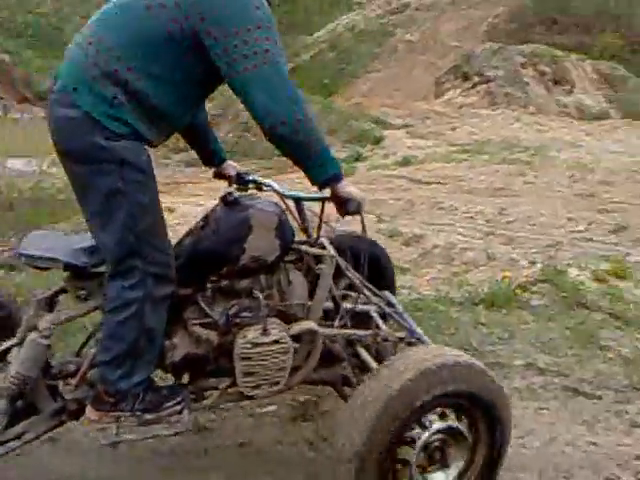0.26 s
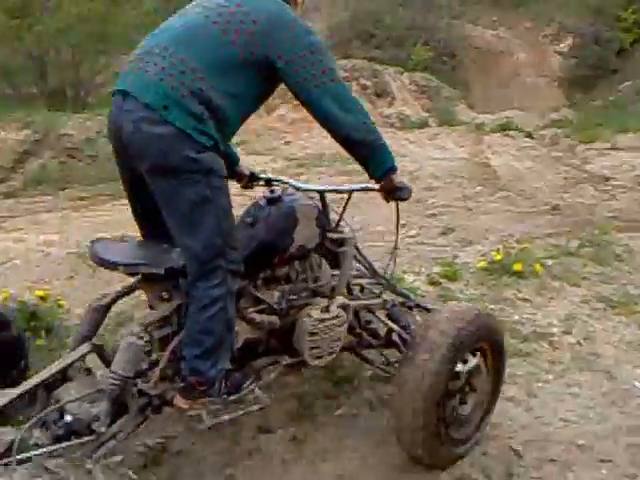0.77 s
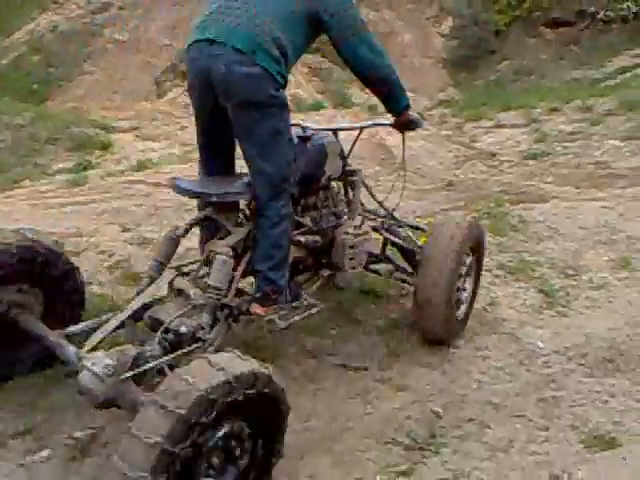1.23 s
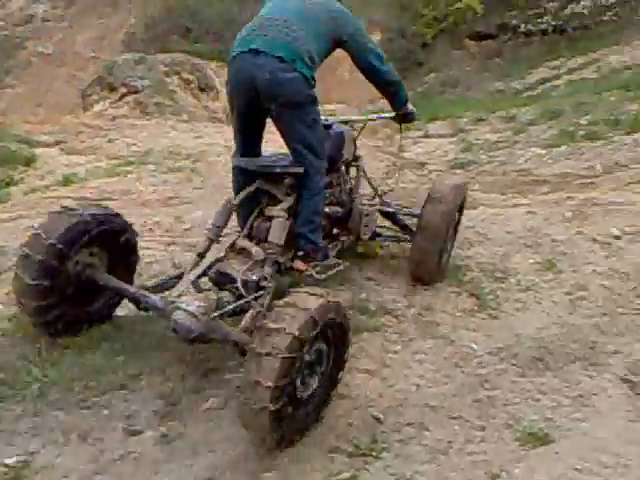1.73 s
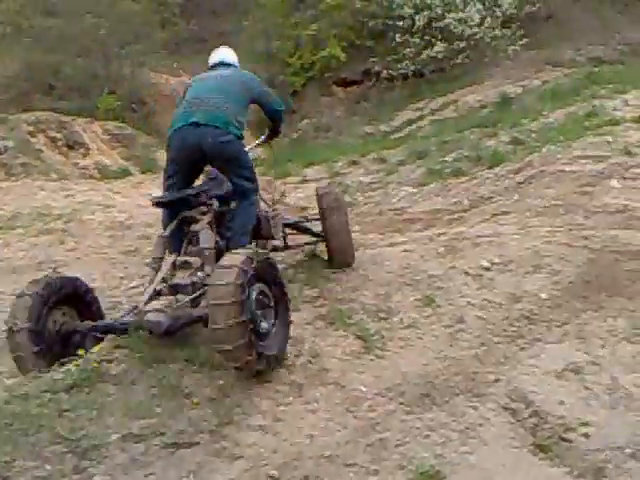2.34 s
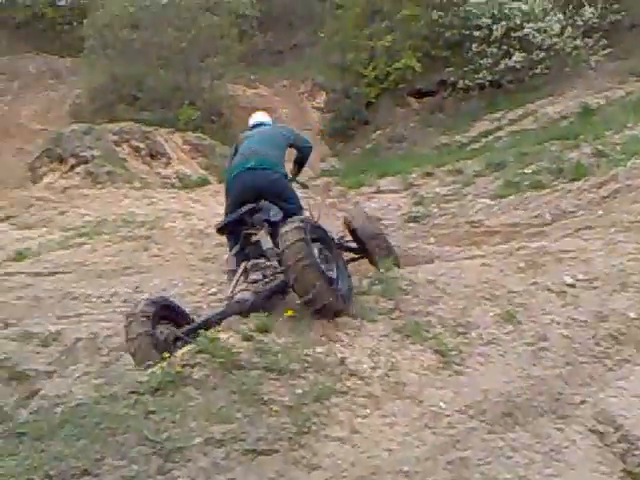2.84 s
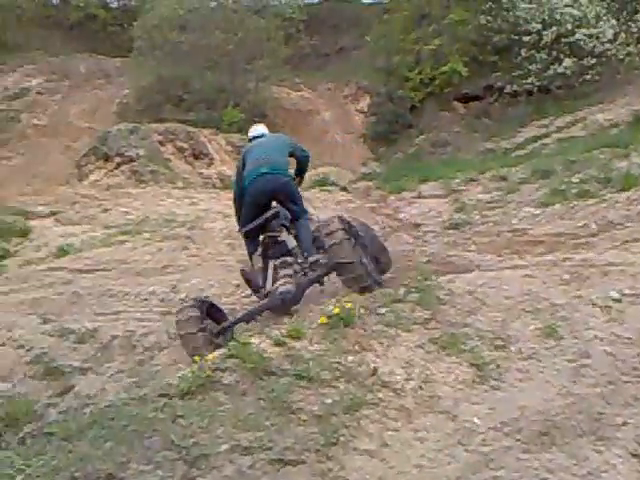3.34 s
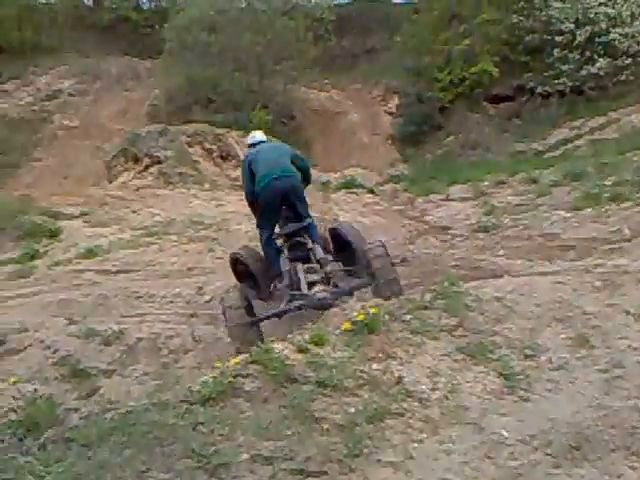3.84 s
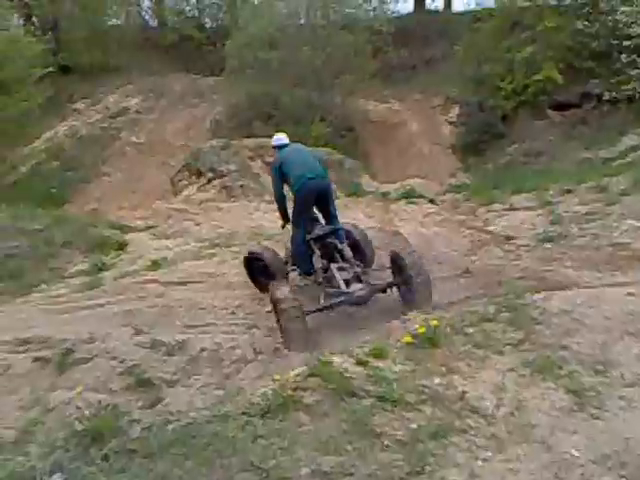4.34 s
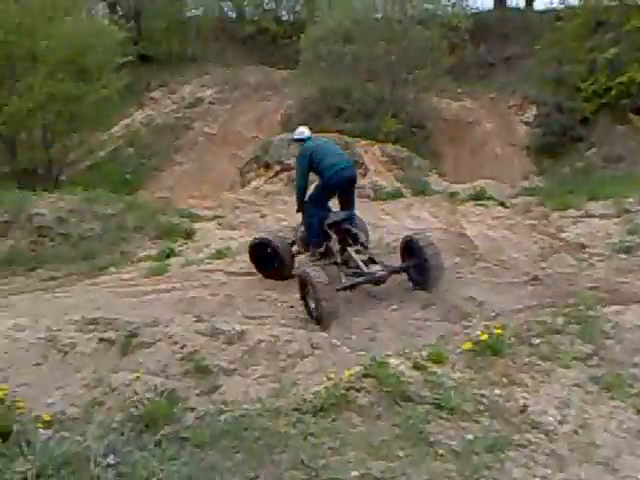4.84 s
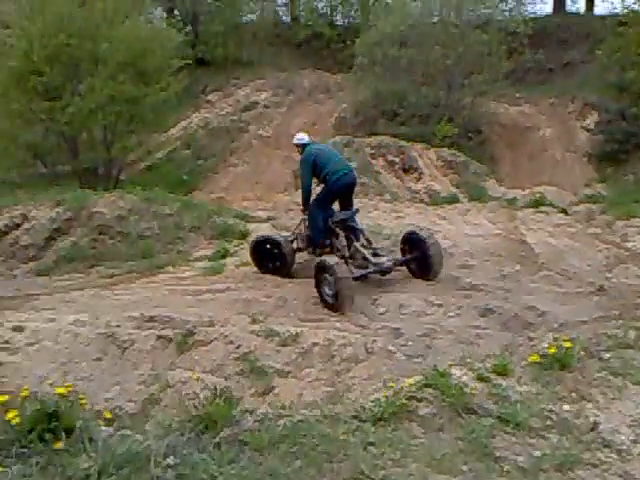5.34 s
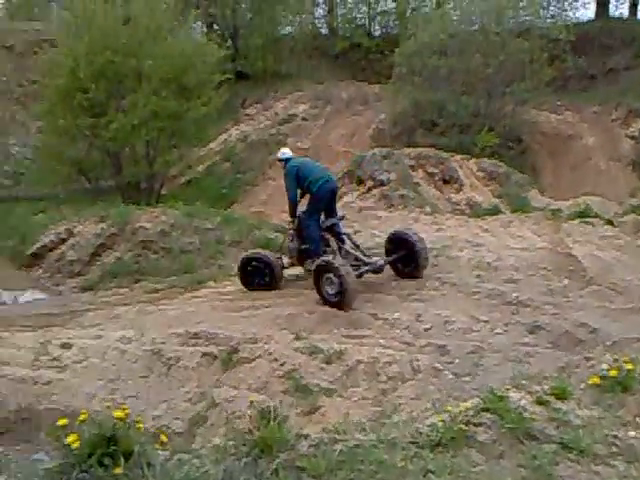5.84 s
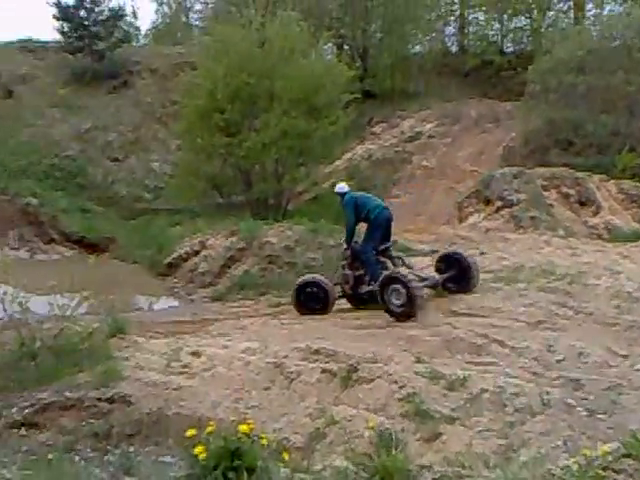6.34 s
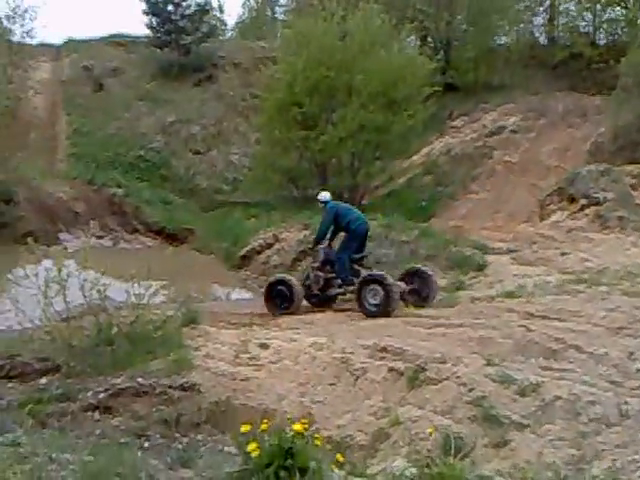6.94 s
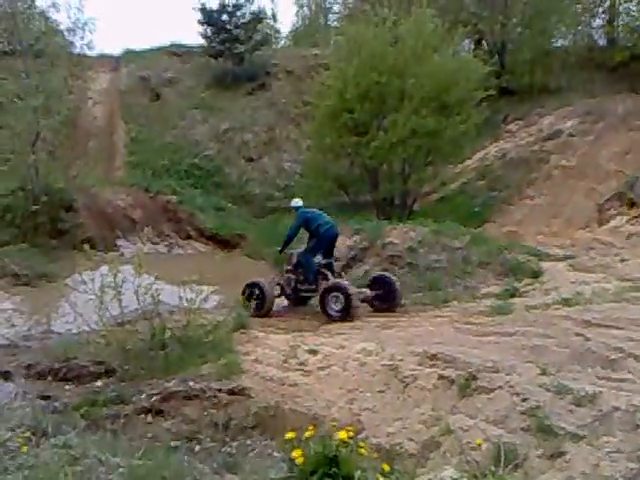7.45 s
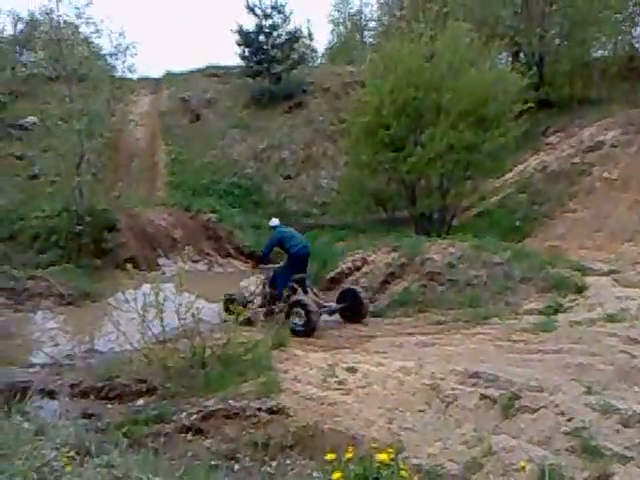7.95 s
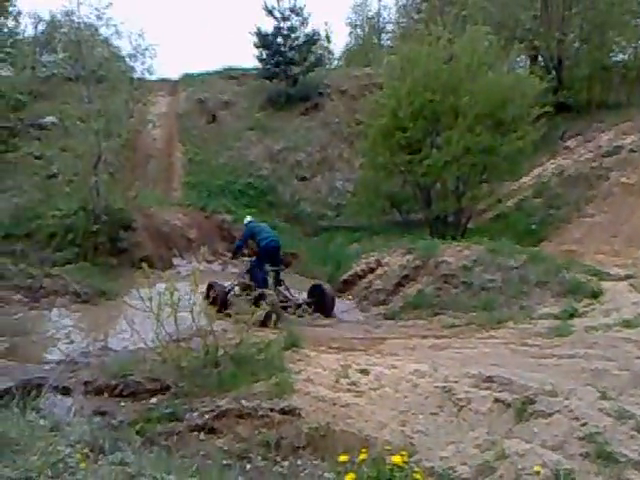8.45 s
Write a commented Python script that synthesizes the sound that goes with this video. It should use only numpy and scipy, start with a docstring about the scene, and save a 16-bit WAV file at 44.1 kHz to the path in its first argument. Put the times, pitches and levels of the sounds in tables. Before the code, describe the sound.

A two-stroke quad engine sputters and pops unevenly as it drives away over dirt, growing fainter.

```python
"""A single-cylinder two-stroke engine drives a home-built quad away over dirt and off into a quarry.
Lightly loaded, it fires on only some turns: each firing is a ragged blast of gas and a thump that
set the exhaust pipe ringing. In between it puffs and clatters unfired over the pipe's fading drone.
The tyres grind on grit and the slopes return a soft echo of the exhaust."""
import sys
import numpy as np
from scipy import signal
from scipy.fft import rfft, irfft
from scipy.io import wavfile
from scipy.ndimage import uniform_filter1d

SR = 44100
rng = np.random.default_rng(int(sys.argv[2]) if len(sys.argv) > 2 else 0)


def put_to_file(sound):
    """Save the sound as 16-bit audio at rate SR, in the file named by the first command-line argument."""
    columns = np.atleast_2d(sound).T  # one column per channel
    safe = np.clip(columns, -1, 1)
    whole_steps = np.round(safe * 32767)
    wavfile.write(sys.argv[1], SR, whole_steps.astype(np.int16))


N = 383229
TIME = np.arange(N) / SR

# cue list of the firings: (time [s], gas blast [dB], pipe ring [dB])
FIRINGS = [(0.2067, -23.5, -31), (0.3687, -21, -21), (0.4125, -15, -25), (0.458, -20, -21),
           (0.4979, -16, -19.5), (0.5386, -18, -21), (0.5741, -18, -20), (0.6123, -19.0, -22),
           (0.8213, -21, -25), (0.868, -16.5, -17), (0.9579, -16.5, -17.5), (1.0502, -20.5, -23),
           (1.1879, -22, -21), (1.2349, -18.5, -11.5), (1.3239, -17.5, -20.5), (1.458, -28, -20),
           (1.6083, -19, -17.5), (1.6544, -21, -24), (1.6975, -21, -29), (1.7828, -22.5, -20.5),
           (1.8242, -19.5, -20), (1.8675, -21.5, -25), (1.9537, -20.5, -23), (1.996, -18, -22),
           (2.0361, -19.5, -26), (2.117, -19.5, -25), (2.3513, -28, -28), (2.7532, -30, -32.5),
           (2.808, -29, -32), (2.8581, -30.5, -28), (2.9515, -30.5, -36), (2.9937, -23.5, -31),
           (3.036, -37.5, -39), (3.1203, -24, -32), (3.3701, -27.5, -32), (3.5331, -25.5, -30),
           (3.5844, -43.5, -62), (3.7018, -21, -43), (3.8332, -36.5, -38), (3.8729, -29.5, -35.5),
           (3.998, -43.5, -40), (4.039, -28.5, -36), (4.1569, -33.5, -37), (4.1947, -26, -34),
           (4.245, -44, -52), (4.3502, -26, -40), (4.4264, -24.5, -41), (4.5847, -27, -46),
           (4.661, -27, -41), (4.7372, -22, -42), (4.7743, -26, -40), (4.8094, -25.5, -53),
           (4.8808, -25, -60), (4.9512, -25, -48), (4.9994, -41.5, -59), (5.0331, -40.5, -63),
           (5.1387, -29.5, -30), (5.1911, -45, -59), (5.2343, -46.5, -61), (5.4588, -46, -59),
           (5.6034, -36.5, -33), (5.8481, -40.5, -39), (5.9117, -38.0, -45), (6.0397, -38.5, -47),
           (6.1019, -34.5, -40), (6.157, -34, -38), (6.2668, -35.5, -42), (6.3719, -37, -56),
           (6.4727, -34, -42), (6.5673, -33, -41), (6.6557, -33, -42), (6.7397, -32.5, -38),
           (6.8198, -26.5, -35), (6.8996, -31.5, -35), (6.9804, -30.5, -39), (7.5922, -36, -29.5),
           (7.936, -35.5, -27.5), (8.324, -39, -33), (8.6076, -47, -44)]
# crank speed: (time [s], speed [turns/s])
CRANK_SPEED = [(0, 22), (.55, 25), (.9, 22), (1.5, 22), (2.1, 24.5), (2.7, 18), (3.1, 24), (3.6, 18),
               (4.1, 25), (4.9, 28), (5.9, 16), (6.9, 25), (7.5, 19), (8.69, 18)]
# how we hear the exhaust: (time [s], aspect [0 beside, 1 behind, 2 afar])
ASPECT = [(0, 0.68), (2, 0.9), (2.8, 1), (5.2, 1), (6, 1.7), (8.69, 2)]
# silencer chambers: (frequency [Hz], width [Hz], gain beside [dB], behind [dB], afar [dB])
SILENCER_MODES = [(70.4, 7.5, -6, -7, 0.5), (91.6, 18.7, 3, 2.5, 4), (133.8, 15.6, -8, -0.5, -4),
                  (204.02, 57, -29.5, -2, -19)]
# faders riding effort and distance, ahead of each layer's trim: (time [s], clatter [dB], puffs [dB])
MACHINE_FADERS = [(0.0, -38, -37), (0.34, -41, -41), (0.51, -33, -34), (1.21, -40.5, -34.5),
                  (1.47, -43, -39), (1.94, -40.5, -31.5), (2.59, -58, -52.5), (2.78, -64, -58),
                  (2.95, -47, -37), (3.22, -54.5, -45), (4.19, -54, -47.5), (4.79, -48.5, -44.5),
                  (5.69, -58, -56), (6.29, -53.5, -61), (6.85, -46, -41), (7.36, -59, -58.5),
                  (8.35, -57, -60), (8.69, -57.5, -71)]
# colours of the engine's clatter and hiss: (frequency [Hz], relative level [dB])
CLATTER_COLOUR = [(60, -6), (170, -21.5), (320, 4.5), (480, -2.5), (660, -3), (950, -3), (1200, -8.5),
                  (2200, -7.5), (3100, -8), (4400, -26.5), (6000, -38), (10000, -81)]
HISS_COLOUR = [(3500, -45), (4400, 4.5), (5600, 13), (6400, 6.5), (7600, 8), (8300, 0), (9200, -5),
               (12000, -24.5), (16000, -29)]
# engine casing resonances: (frequency [Hz], width [Hz], gain [dB])
CASING_MODES = [(668, 81, -5.5), (1464, 68, 8.5), (2040, 110, 5.5), (2485, 48, 0), (3650, 370, 0),
                (4610, 80, 7), (5510, 68, -6), (6230, 81, 1), (7780, 120, 5)]
# short swells of the exhaust pipe's drone: (time [s], level [dB])
DRONE_SWELLS = [(.045, -38), (0.229, -30), (.43, -26), (.59, -25.5)]
# colour of the gas blast from each aspect: (frequency [Hz], relative level [dB])
BLAST_BESIDE = [(200, -44.5), (370, 1), (490, -63.5), (700, 8), (950, 16.5), (1300, -2), (2300, -5),
                (3200, -6.5), (4300, 20), (5400, -29), (6200, -4), (7400, -8), (9000, -29), (16000, -18)]
BLAST_BEHIND = [(200, 5.5), (290, -1.5), (480, -3), (800, 0), (1500, 2), (2200, 2.5), (3200, -3.5),
                (4300, -15), (5300, -14), (6300, -29), (7400, -20), (9000, -38), (11000, -37.5),
                (16000, -53)]
BLAST_AFAR = [(200, -21), (480, -4), (700, 3.5), (1100, -2), (1550, 1.5), (2100, 2), (3200, -4),
              (4300, -10), (5400, -6), (6300, -16.5), (7600, -19), (9000, -24.5), (11000, -28.5),
              (16000, -45)]
# decay time of a blast: (beside [s], behind [s], afar [s])
BLAST_DECAY = [.0045, .0023, .0035]
# treble trim of a blast: (beside [dB], behind [dB], afar [dB])
BLAST_TREBLE = [0, -13, -7]
# the thump grows with the blast and levels off on the hardest firings: (blast [dB], thump [dB])
THUMP_LAW = [(-39, -41), (-37, -31), (-33.5, -31), (-17.5, -20.5)]
# the pipe's first three modes: (frequency [Hz], t60 [s])
PIPE_MODES = [(322, .11), (642, .125), (975, .115)]
# upper rings of pipe and cooling fins:
# (frequency [Hz], t60 [s], relative level beside [dB], behind [dB], afar [dB])
UPPER_RINGS = [(760, .06, -7, -16, -11), (1295, .06, -14, -22, -21), (1600, .04, -15, -14, -8),
               (1935, .09, -18, -19, -4), (2265, .06, -8, -13, -24), (2560, .07, -20, -20, -11),
               (5370, .06, -25, -25, -28), (6775, .06, -20, -28, -28)]
# echo tail of the open quarry: (frequency [Hz], t60 [s])
QUARRY_DECAY = [(60, 0.95), (300, 0.97), (1500, 0.53), (4000, 0.56), (16000, 0.1)]


def from_db(db):
    """Decibels to gain."""
    return 10 ** (np.asarray(db) / 20)


def rms_one(x):
    """Scale to rms 1."""
    return x / np.sqrt(np.mean(x ** 2) + 1e-20)


def curve(rows, at=TIME):
    """Each column of a table as a lane of straight ramps in time."""
    s, *columns = np.transpose(rows)
    return [np.interp(at, s, c) for c in columns]


def at_hz(points, hz):
    """Read a table on a log-frequency axis."""
    f, value = np.transpose(points)
    return np.interp(np.log(hz + 1), np.log(f), value)


def butter(x, hz, kind, order=2):
    """Causal Butterworth filter."""
    return signal.sosfilt(signal.butter(order, hz, kind, fs=SR, output="sos"), x + 1e-18)


def noise(colour, size=N):
    """Noise of a given colour, rms 1."""
    hz = np.fft.rfftfreq(size, 1 / SR)
    return rms_one(irfft(rfft(rng.standard_normal(size)) * from_db(at_hz(colour, hz)), size))


def wobble(depth, hz, size=N):
    """Random modulation around 1, low-passed at hz."""
    return 1 + depth * rms_one(butter(rng.standard_normal(size), hz, "low"))


def resonate(x, hz, width):
    """Resonance with gain 1 at its peak."""
    r = np.exp(-np.pi * width / SR)
    feedback = [1, -2 * r * np.cos(2 * np.pi * hz / SR), r * r]
    return signal.lfilter(np.array([1, 0, -1]) * (1 - r * r) / 2, feedback, x + 1e-18)


def clicks(times, heights):
    """One sample per event."""
    out = np.zeros(N)
    np.add.at(out, np.clip(np.round(times * SR).astype(int), 0, N - 1), heights)
    return out


def add(out, s, sound):
    """Mix a sound in from time s."""
    i = max(round(s * SR), 0)
    out[i:i + len(sound)] += sound[:N - i]


def facing(s):
    """Crossfade weights of beside, behind and afar at time s."""
    return np.maximum(1 - abs(curve(ASPECT, s)[0] - np.arange(3)), 0)


def thump_of(blast_db):
    """Level of the thump that goes with a blast, in dB."""
    return np.interp(blast_db, *np.transpose(THUMP_LAW))


def unfired_turns():
    """Times of the crank turns that pass between the firings."""
    marks = np.r_[-.02, np.array(FIRINGS)[:, 0], N / SR + .02]
    speed, = curve(CRANK_SPEED, (marks[1:] + marks[:-1]) / 2)
    counts = np.maximum(np.round(np.diff(marks) * speed), 1).astype(int)
    times = np.concatenate([np.linspace(a, b, n + 1)[1:-1] for a, b, n in zip(marks, marks[1:], counts)])
    return times[(times > 0) & (times < N / SR)]


def silencer(kicks, pulse_s, suction, suction_s, leak_hz):
    """A slight suction, then a pressure hump; its edge escapes and the rest booms in the chambers."""
    t = np.arange(-SR // 100, SR // 100) / SR
    hump = np.exp(-.5 * (t / pulse_s) ** 2) - suction * np.exp(-.5 * ((t + suction_s) / .0022) ** 2)
    flow = signal.fftconvolve(kicks, hump, "same")
    aspect, = curve(ASPECT)
    boom = sum(from_db(np.interp(aspect, np.arange(3), dbs)) * resonate(flow, hz, width)
               for hz, width, *dbs in SILENCER_MODES)
    return butter(butter(flow, leak_hz, "high", order=1) + boom, 25, "high")


def puffs(turns, trim_db=-2, rumble_db=-2):
    """Each unfired turn pushes a soft puff through the silencer, over a bed of low rumble."""
    _, fader_db = curve(MACHINE_FADERS)
    kicks = clicks(turns, from_db(rng.normal(0, 2, len(turns))))
    puffing = rms_one(silencer(kicks, pulse_s=.0018, suction=.3, suction_s=.0067, leak_hz=570))
    rumble = noise([(15, -20), (30, -45.5), (55, -24), (92, 8),
                    (125, -5.5), (250, -9.5), (600, -8), (3000, -41)])
    return from_db(fader_db + trim_db) * (puffing + from_db(rumble_db) * rumble)


def tyre_grit(grains_per_s=700):
    """The tyres crunch on grit: a spray of tiny midrange clicks."""
    grains = (rng.random(N) < grains_per_s / SR) * rng.standard_normal(N)
    return rms_one(butter(grains, [700, 3500], "band"))


def clatter(turns, slap_db=-12, attack_s=.004, trim_db=-1.5, hiss_db=-12.5):
    """Unfired turns chuff and the piston slaps half a turn later; the casing colours them and the grit."""
    fader_db, _ = curve(MACHINE_FADERS)
    speed, = curve(CRANK_SPEED, turns)
    chuffs = clicks(turns - attack_s, from_db(rng.normal(0, 3.5, len(turns))))
    slaps = clicks(turns + .5 / speed, from_db(rng.normal(slap_db, 3, len(turns))))
    age = TIME[:SR // 20] / attack_s
    pulses = 2.1 * signal.fftconvolve(chuffs + slaps, age * np.exp(1 - age))[:N]
    rattle = rms_one(noise(CLATTER_COLOUR) * (1 + pulses))
    hiss = rms_one(noise(HISS_COLOUR) * (1 + .7 * pulses))
    mix = from_db(fader_db) * (from_db(trim_db) * (rattle + .2 * tyre_grit()) + from_db(hiss_db) * hiss)
    casing = sum(from_db(db) * resonate(mix, hz, width) for hz, width, db in CASING_MODES)
    return .75 * (mix + casing)


def pipe_drone(hz=321, bed_db=-41.5, hold_s=.62, fade_db_per_s=9, swell_s=.016):
    """The exhaust pipe's wavering low note holds and swells as the quad pulls away, then fades."""
    phase = 2 * np.pi * np.cumsum(hz * wobble(.035, hz=40)) / SR
    tone = rms_one(np.sin(phase) * wobble(.6, hz=40))
    bed = from_db(bed_db - fade_db_per_s * np.maximum(TIME - hold_s, 0))
    swells = sum(from_db(db) * np.exp(-.5 * ((TIME - s) / swell_s) ** 2) for s, db in DRONE_SWELLS)
    return (bed + swells) * tone


def blasts(lead_s=.0055, rise_s=.0012, tail_db=-22, return_s=.016, return_db=-17, bounce=.16):
    """The port cracks open, gas tears out for milliseconds, and a duller wave returns from the silencer."""
    out, size = np.zeros(N), 4096
    t = np.arange(size) / SR - lead_s + .000056  # zero at the blast's peak
    before, after = np.minimum(t, 0), np.maximum(t, 0)
    rise = .18 * np.clip(1 + t / lead_s, 0, 1) + .82 * np.exp(-.5 * (before / rise_s) ** 2)
    tail = from_db(tail_db) * (1 - np.exp(-after / .002)) * np.exp(-after / .011)
    returning = from_db(return_db) * np.exp(-abs(t - return_s) / .0035)
    hz = np.geomspace(100, 16000, 60)
    colours = np.array([at_hz(c, hz) for c in (BLAST_BESIDE, BLAST_BEHIND, BLAST_AFAR)])
    # the wave bounces between the ends of the pipe, which makes the blast hollow
    round_trip = np.r_[1, np.zeros(round(SR / PIPE_MODES[0][0]) - 1), -bounce]
    for s, level_db, _ in FIRINGS:
        view = facing(s)
        jet = rise * np.exp(-after / (view @ BLAST_DECAY)) + tail
        ragged_db = rng.normal(0, 2, len(hz))
        gas = noise(np.c_[hz, view @ colours + ragged_db], size)
        body = butter(butter(gas, 152, "high"), 4540, "low", order=6) * (jet + returning)
        body = signal.lfilter([1], round_trip, body)
        sizzle = butter(gas, 5100, "high", order=6) * (uniform_filter1d(jet, size=170) + .4 * returning)
        # level the body's mids and the sizzle to the energy of 15 ms at rms 1
        body /= np.sqrt(np.sum(butter(body, [1100, 3600], "band") ** 2) / (.015 * SR))
        sizzle /= np.sqrt(np.sum(sizzle ** 2) / (.015 * SR))
        treble = from_db(view @ BLAST_TREBLE + rng.standard_normal())
        add(out, s - lead_s, from_db(level_db) * (body + treble * sizzle))
    return out


def thumps(push_db=14, shock_db=16, shock_s=.0002, knock_delay_s=.01094):
    """The low push of every firing; a steep shock front and a knock beam out behind the pipe."""
    times, blast_db, _ = np.transpose(FIRINGS)
    heights = from_db(thump_of(blast_db) + push_db)
    push = silencer(clicks(times, heights), pulse_s=.0008, suction=.27, suction_s=.003, leak_hz=600)
    behind = np.array([facing(s)[1] for s in times])
    # the push comes back from the silencer's far end as a knock, harder as the crank speeds up
    speed, = curve(CRANK_SPEED, times)
    knock_heights = from_db(24.5 + .6 * (speed - 26)) * heights * behind ** 3
    knocks = butter(clicks(times + knock_delay_s, knock_heights), 250, "low")
    fronts = clicks(times, from_db(blast_db + shock_db) * (.1 + .4 * behind))
    shocks = signal.lfilter([1], [1, -np.exp(-1 / (shock_s * SR))], fronts + 1e-18)
    return push + butter(butter(shocks, 3000, "low", order=4) + knocks, 140, "high", order=1)


def pipe_ring(first_db=-9, upper_db=-2, scatter_db=3, sag=.01, cooling_s=.0047, attack_s=.002):
    """Every firing rings the pipe; the pitch follows the heat of that charge and sags as the gas cools."""
    out, t = np.zeros(N), TIME[:SR // 5]
    for s, blast_db, ring_db in FIRINGS:
        # two modes share the ring's power: hard firings favour the third, soft ones the second
        third_lead_db = -3 + 1.4 * (blast_db + 25) + rng.normal(0, 3)
        second_db = ring_db - 10 * np.log10(1 + from_db(third_lead_db) ** 2)
        levels = [thump_of(blast_db) + first_db, second_db, second_db + third_lead_db]
        modes = [(hz, t60, db) for (hz, t60), db in zip(PIPE_MODES, levels)]
        modes += [(hz, t60, blast_db + upper_db + facing(s) @ dbs + rng.normal(0, scatter_db))
                  for hz, t60, *dbs in UPPER_RINGS]
        heat = rng.normal(1, .012)
        bent_time = np.cumsum(heat + sag * np.exp(-t / cooling_s)) / SR
        tone = sum(from_db(db - 60 * t / t60) * np.sin(2 * np.pi * (hz * bent_time + rng.random()))
                   for hz, t60, db in modes)
        flutter = wobble(.18, hz=90, size=len(t))
        add(out, s, tone * flutter * (1 - np.exp(-t / attack_s)))
    return out


def quarry_echo(x, near_db=-22, far_db=-18, build_s=.0022):
    """Scattered echoes from the slopes, dying by band; the send rises as the quad moves off."""
    t, tail = TIME[:SR], np.zeros(SR)
    edges = np.geomspace(40, 16000, 9)
    for lo, hi in zip(edges, edges[1:]):
        t60 = at_hz(QUARRY_DECAY, np.sqrt(lo * hi))
        tail += butter(rng.standard_normal(SR), [lo, hi], "band") * from_db(-60 * t / t60)
    tail *= 1 - np.exp(-t / build_s)
    tail = butter(tail / np.sqrt(np.sum(tail ** 2)), 9000, "low", order=1)
    send = from_db(np.linspace(near_db, far_db, N))
    return signal.fftconvolve(x * send, tail)[:N]


def scene():
    """Mono mix: the firings and their echo over the dry puffs, clatter and drone."""
    turns = unfired_turns()
    exhaust = blasts() + thumps() + pipe_ring()
    return (exhaust + quarry_echo(exhaust) + puffs(turns) + clatter(turns) + pipe_drone())[None]


def record(dry, ceiling=.87, stop_hz=16600):
    """Soft-clip the loudest peaks and cut the very top."""
    high_cut = signal.cheby2(16, 60, stop_hz, fs=SR, output="sos")
    return signal.sosfilt(high_cut, ceiling * np.tanh(dry / ceiling))


dry = scene()
out = record(dry)
put_to_file(out)
```